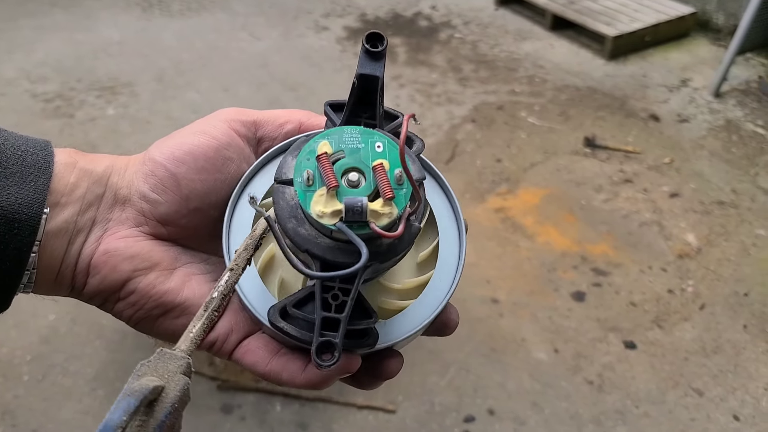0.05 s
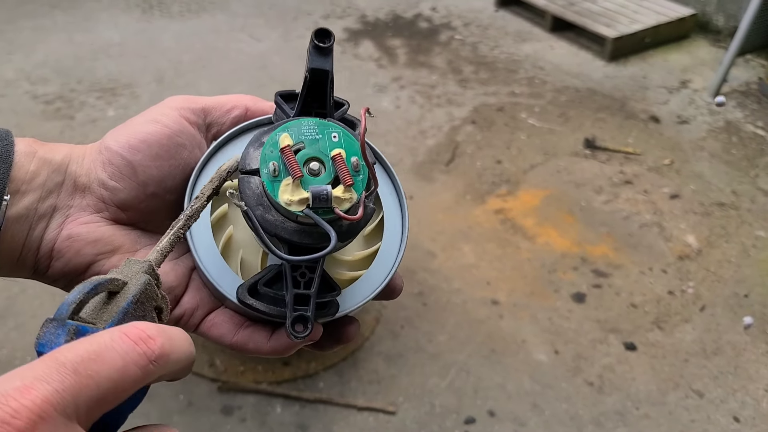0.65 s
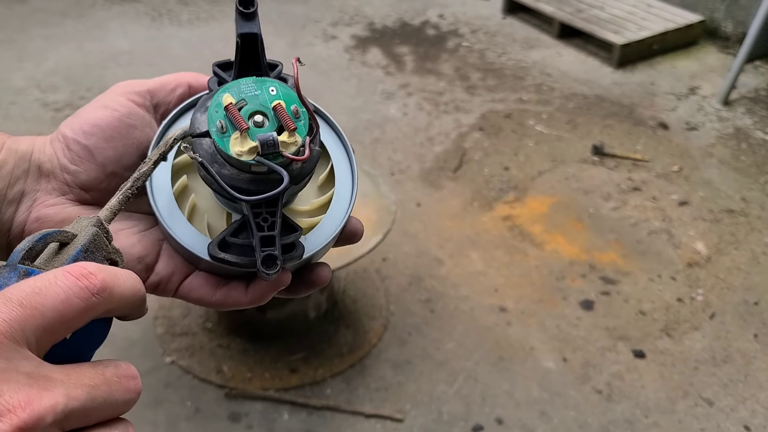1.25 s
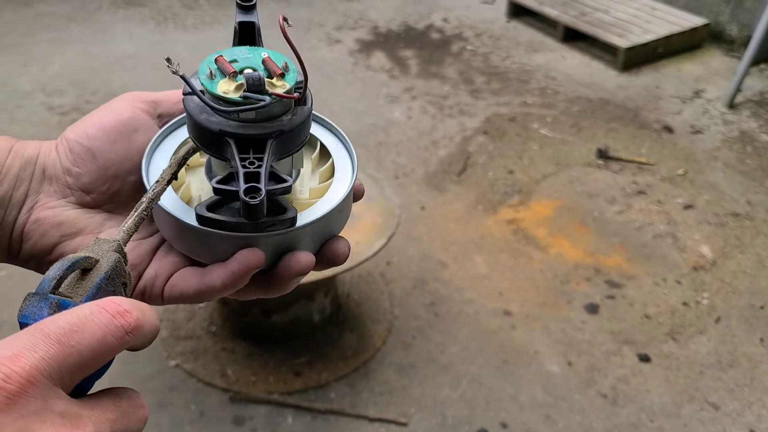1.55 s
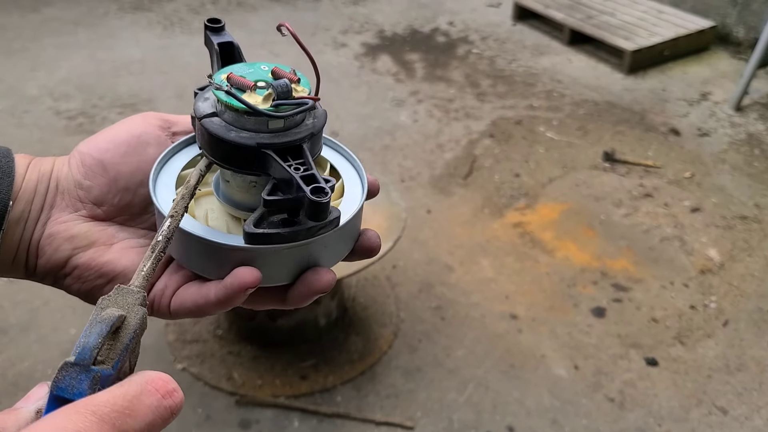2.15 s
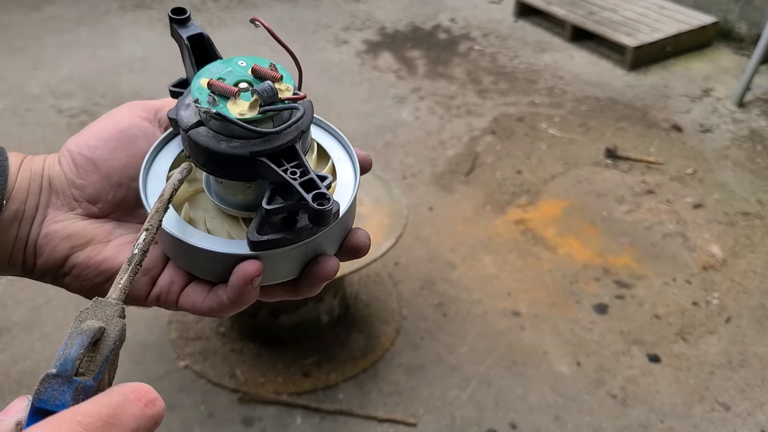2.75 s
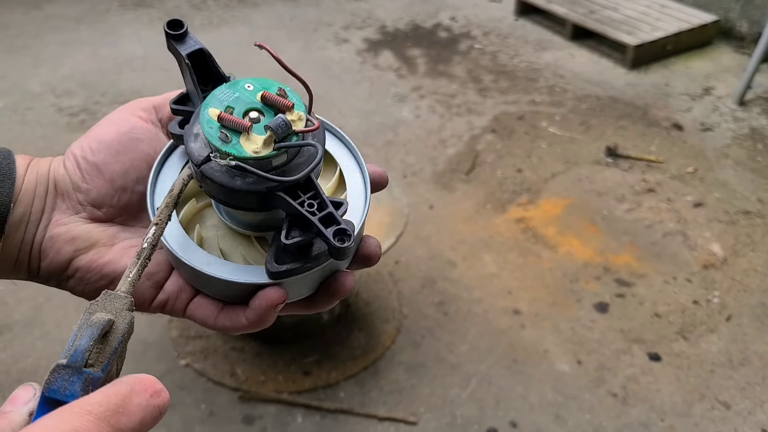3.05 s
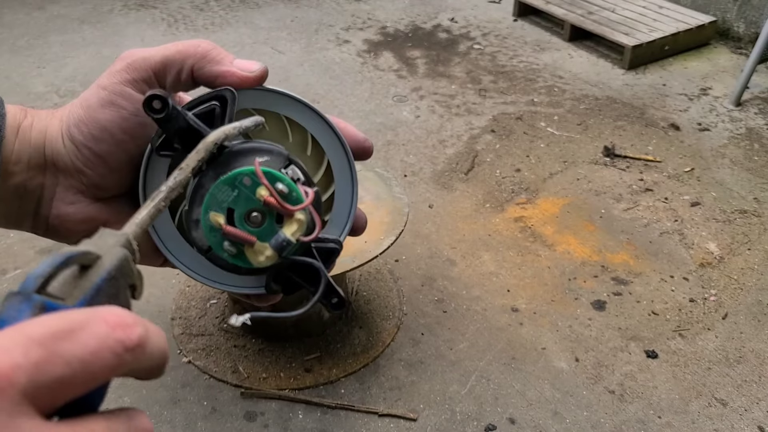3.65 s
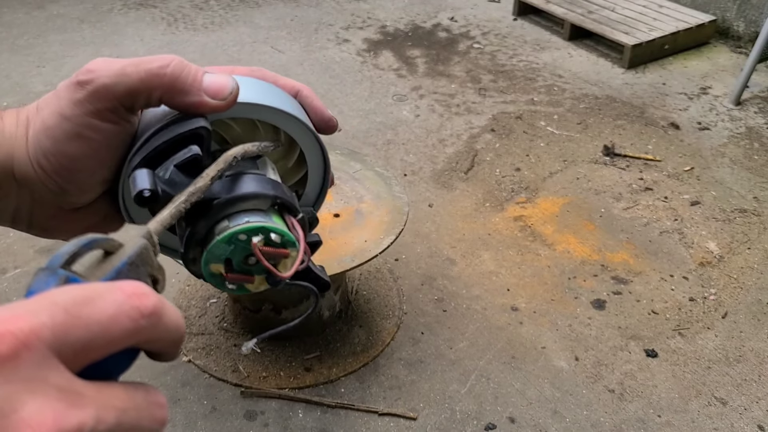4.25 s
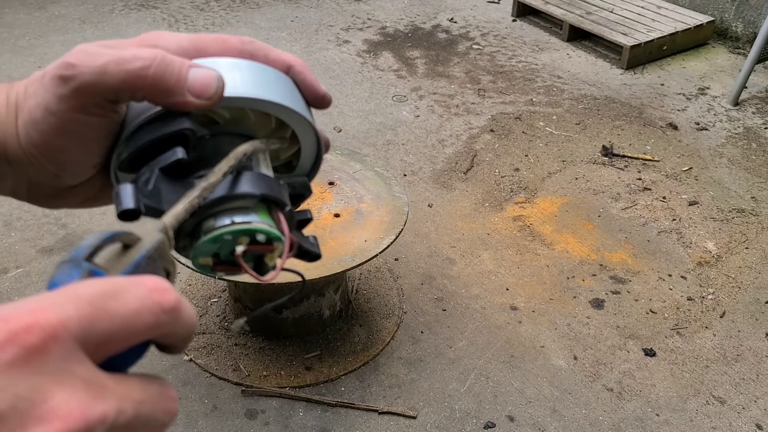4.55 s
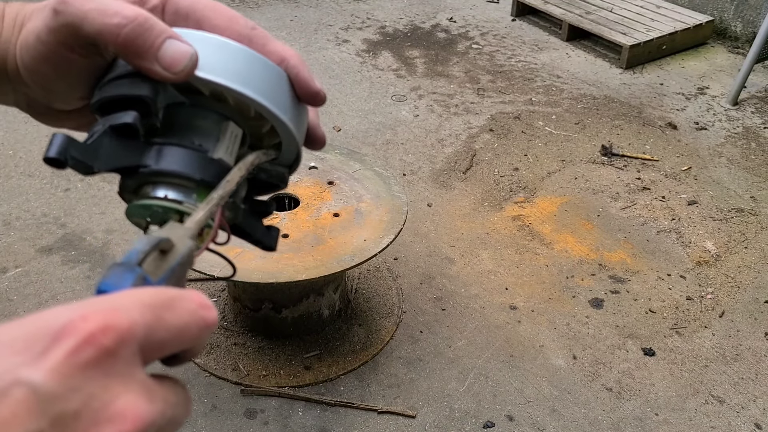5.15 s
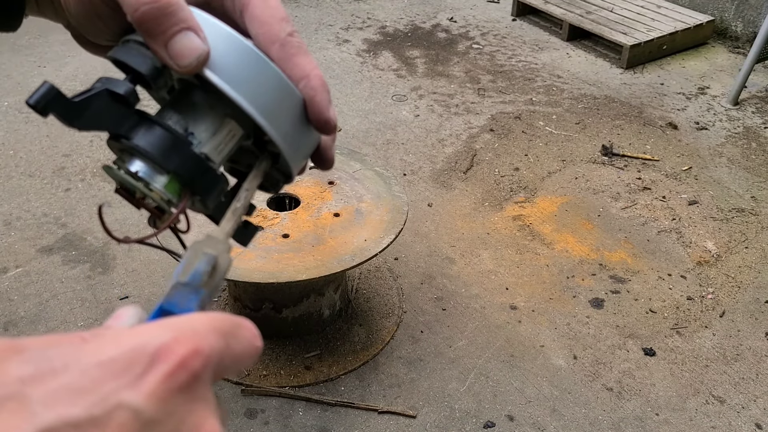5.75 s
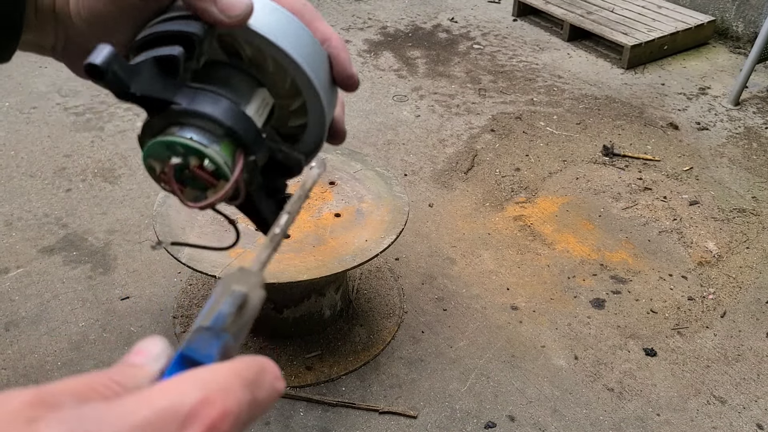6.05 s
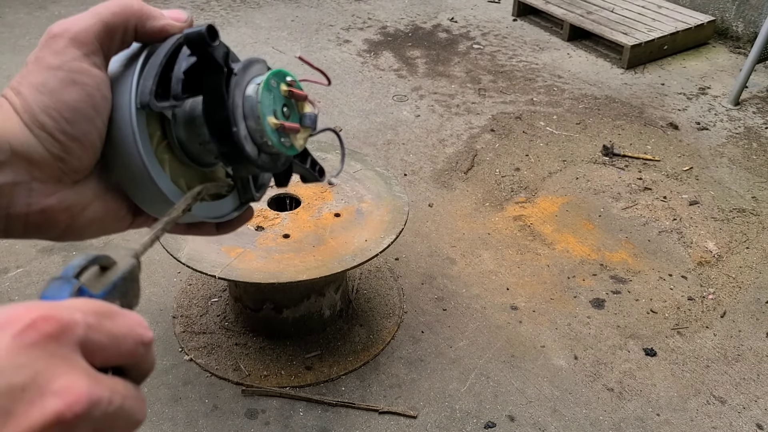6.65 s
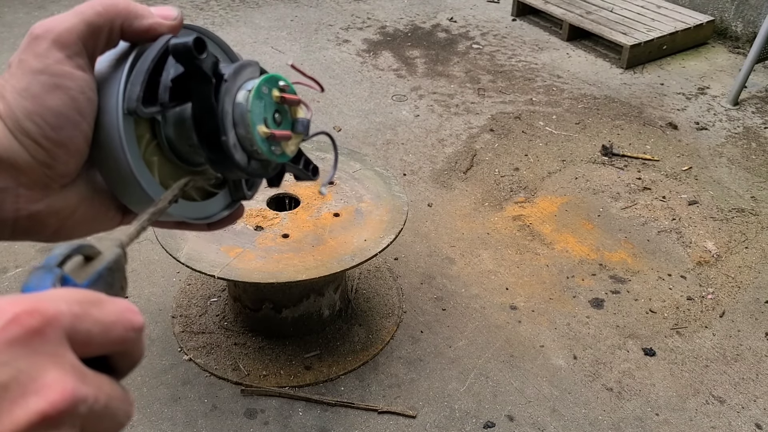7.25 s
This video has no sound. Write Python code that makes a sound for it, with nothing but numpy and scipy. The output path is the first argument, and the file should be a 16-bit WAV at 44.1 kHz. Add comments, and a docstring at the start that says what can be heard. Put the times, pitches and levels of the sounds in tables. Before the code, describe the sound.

Compressed air hisses loudly into a small motor's fan housing, close by in a concrete yard, wavering in tone and lightly buffeting the microphone. It stops briefly, then a second long blast turns hollower as a piston compressor cuts in with a low hum. Air seeps faintly from the valve in the next pause before a third blast starts sharply. Machinery drones quietly far away.

```python
"""A blow gun's air jet cleans a small hand-held vacuum motor and its fan: three long blasts.
The turbulent jet hisses on the parts and excites the resonances of the fan housing; deflected air
buffets the microphone and briefly sounds edge tones. Air seeps from the valve before the last blast.
Near the end of the middle blast a piston compressor cuts in and hums on. The concrete yard returns
a short echo of the jet, and machinery drones far off."""
import sys
import numpy as np
from scipy import signal
from scipy.fft import rfft, irfft, next_fast_len
from scipy.io import wavfile

SR = 44100
rng = np.random.default_rng(int(sys.argv[2]) if len(sys.argv) > 2 else 0)


def generate_wav(signal):
    """Clip the signal to [-1, 1] and save it as 16-bit WAV at the path in sys.argv[1]."""
    frames = np.transpose(np.atleast_2d(signal))
    scaled = np.clip(frames, -1, 1) * 32767
    pcm = np.round(scaled).astype(np.int16)
    wavfile.write(sys.argv[1], SR, pcm)


N = 325899
TIME = np.arange(N) / SR

# Trigger pulls; the finger slips once in the last blast, which thus takes two rows.
# Each row: start of opening, time taken to open, start of closing, all in seconds.
TRIGGER_PULLS = [(-.2, .03, 3.033), (3.4, 0.044, 6.001), (6.615, 0.022, 7.348), (7.351, 0.03, 8.25)]
# Strength of the jet's impact. Each row: time in seconds, overall gain, sizzle gain, housing gain in dB.
JET_GAINS = [
    [(0, -21.5, 1.0, -2), (0.3, -21.0, 0.5, -4), (0.85, -22.5, 0.5, -1), (1.2, -19, -1, -3.5),
     (1.68, -20.5, 0, -0.5), (1.79, -19, 2.5, -4.5), (2.3, -21.5, 5.5, -6), (2.5, -20.5, 2, -4.5),
     (3.02, -21.0, -0.5, -3.5)],
    [(3.44, -24.5, -3, -3), (3.52, -21.0, 3, -5), (3.9, -24, 3, -1.5), (4.2, -21, 1, -4.0),
     (4.7, -22, 6, -4.5), (4.8, -22.5, 0.5, -2), (4.92, -22.5, 4.5, -2.5), (5.3, -21, 0.5, -5),
     (5.47, -25.5, -0.5, -3), (5.75, -22.0, 2, -5), (5.88, -24.5, 1.0, -4.5), (5.99, -20, 7.5, -4)],
    [(6.64, -19.0, -1, -3), (6.9, -21, 1, -2.0), (7.1, -18.5, -1, -1.5), (7.33, -20.0, 0, -2)],
]
# The fan housing's resonance shifts with the aim. Each row: time in seconds, frequency in Hz.
HOUSING_RESONANCE = [(0, 2835), (.83, 2874), (1.02, 2720), (1.06, 2924), (1.73, 3007), (1.8, 2680),
                     (2.0, 2668), (2.64, 2950), (3.5, 3025), (4.78, 3050), (5.5, 2856), (7.39, 2931)]
# Where the jet strikes, as heard at the microphone's two ports. Each row: time in seconds,
# lead of the left port in microseconds, coherence 0-1, left minus right level in dB.
JET_AIM = [(0, 0, 0.2, -0.5), (.6, 13, .17, 0), (1.1, 56, 0.33, -1), (1.65, 65, 0.55, 0),
           (1.95, 41, .56, -2), (2.3, 62, .42, -0.5), (3.03, 47, 0.62, 0), (3.44, 3, 0.43, -1),
           (4.9, 11, .3, -1.4), (5.5, 10, 0.09, 1), (6.63, 61, .75, -1.8), (7.39, 66, 0.64, -2)]
# Spectra of the jet's hiss, its fine sizzle and the rush through the housing.
# Each row: frequency in Hz, relative spectral density in dB.
HISS_SPECTRUM = [(2200, -19), (3300, 4.5), (4100, -3.5), (5000, -0.5), (5700, 1.5), (6400, -1), (7200, 0.5),
                 (8000, 1), (8900, 0.5), (9800, 2), (11500, -10.5), (15000, -32)]
SIZZLE_SPECTRUM = [(7500, -19.5), (9500, -12), (10400, -2.5), (11700, 0), (12600, 0), (13400, -1),
                   (14200, -1), (15300, 0), (16500, -5)]
RUSH_SPECTRUM = [(100, -19), (300, -9), (550, -27), (750, -0.5), (1000, 0), (1350, 2), (1650, 2.5),
                 (1950, 3), (2300, 0.5), (2900, -7), (4500, -30)]
# The nozzle swerves into the fan (+) or off it (-).
# Each row: midpoint in seconds, length in seconds, change of the housing's ring in dB.
NOZZLE_SWERVES = [(0.12, .08, 2), (0.402, .05, 3.5), (0.524, 0.079, 3), (0.693, .12, 2.5),
                  (0.916, 0.087, -4.5), (1.017, 0.088, -4.5), (1.077, 0.047, 3), (1.355, .09, 1),
                  (1.461, 0.074, -4.5), (1.83, .17, -3.5), (2.308, 0.034, 1.5), (2.467, .08, 2),
                  (2.65, 0.11, 2), (3.474, 0.024, -3), (3.605, 0.092, -4), (3.773, 0.15, 1.5),
                  (3.97, 0.044, 1), (4.65, 0.084, -10), (4.732, .05, 2.5), (5.168, 0.027, 1.5),
                  (5.966, 0.042, 1.5), (6.64, 0.027, 0.5)]
# Grazing an edge narrows part of the hiss to a band.
# Each row: midpoint in seconds, length in seconds, band centre in Hz, share of the hiss 0-1.
EDGE_GRAZES = [(0.918, .3, 5000, 0), (1.902, .3, 4876, .3), (3.53, .25, 6780, 0.14),
               (7.002, .8, 5870, 0.04)]
# Air modes of the hollow between housing and palm.
# Each row: centre in Hz, half-width in Hz, relative level in dB.
HOLLOW_MODES = [(976, 204, 0), (1966, 190, -0.5), (2500, 160, -4), (5854, 710, -2.5)]
# Turning the motor opens that hollow. Each row: time in seconds, its share of the rush 0-1.
HOLLOW_SHARE = [(0, 0), (2.1, 0), (3.03, 0.33), (4.6, 0.34), (6.0, 1), (6.63, 0.08), (7.39, 0.04)]
# Early reflections off motor and hand. Each row: mean delay in milliseconds, gain.
NEAR_REFLECTIONS = [(.45, .16), (.7, .17), (1.1, .16), (1.9, .13)]
# The two ports differ in colour. Each row: frequency in Hz, left minus right level in dB.
PORT_BALANCE = [(100, -4.5), (800, 1), (1300, -2), (2200, 1.5), (3200, 3), (4100, 1.5), (5000, 2.5),
                (5900, 1.5), (7500, 2), (9000, 3.5), (11500, 4), (13300, 1.2), (15500, 3.5)]
# Edge tones. Each row: midpoint in seconds, length in seconds, pitch at the midpoint in Hz, level in dB.
EDGE_TONES = [(5.178, .025, 2900, -25), (5.383, .016, 2130, -25), (5.446, 0.041, 2047, -16)]
# Steady spill of air onto the microphone. Each row: time in seconds, relative level in dB.
AIR_SPILL = [(0, -35), (.7, -33), (.95, -43.5), (1.3, -31), (2.6, -31), (3.0, -35.5), (3.5, -38),
             (3.7, -36), (4.6, -32), (5.45, -50.5), (7.39, -42.5)]
# Gusts thrown at the microphone.
# Each row: midpoint in seconds, length in seconds, relative level in dB, left minus right level in dB.
AIR_GUSTS = [(.07, 0.13, -25, 2.5), (0.235, 0.096, -26.5, 0), (.36, 0.22, -25.5, 0),
             (0.604, 0.11, -26.5, -3), (0.717, .1, -26, -1), (0.847, 0.033, -27, 1), (1.1, 0.31, -29, -2.5),
             (1.35, 0.17, -26.5, 1.5), (1.63, 0.17, -26.5, 2), (2.21, 0.37, -23, 3), (2.468, 0.12, -26, 4),
             (2.602, 0.11, -26, 2), (2.799, .2, -27.5, -1), (3.546, 0.078, -29, -17),
             (3.712, 0.033, -28, -1), (3.786, 0.041, -25, 5), (3.856, 0.057, -29.5, -17),
             (3.972, 0.058, -23, -8), (4.087, 0.2, -33, -19), (4.264, 0.084, -26, -5),
             (4.396, 0.14, -29, -20), (4.551, 0.093, -28.5, -24), (4.71, .11, -31, -17),
             (5.03, .07, -30, -10), (5.232, 0.085, -35, -9)]
# Spectra of the wind on the microphone, the seeping air, the compressor's intake and the yard's murmur.
# Each row: frequency in Hz, relative spectral density in dB.
WIND_SPECTRUM = [(15, -30.5), (30, -12), (60, 2.5), (100, 1), (160, -2), (250, -1), (350, -3), (600, -7),
                 (1000, -10), (2000, -16), (5000, -32.5)]
SEEP_SPECTRUM = [(1500, -8), (2700, 2), (3700, 0), (5000, -5), (5900, 2), (7300, -5), (8800, -4),
                 (10300, -4), (13000, 0), (15500, -3)]
INTAKE_SPECTRUM = [(60, 3.5), (150, 3), (300, -5), (500, -9), (1000, -14), (1550, -13), (2200, -19.5),
                   (3200, -21), (5000, -24), (14000, -29)]
YARD_SPECTRUM = [(20, -19), (55, 0), (100, -8), (170, -21), (400, -22), (700, -31.5), (1500, -42.5),
                 (3000, -44.5), (4500, -51), (16000, -58)]
# Thin whistles of the seeping air. Each row: frequency in Hz, level in dB relative to its noise.
SEEP_TONES = [(2680, -10), (3700, -11)]
# The compressor's harmonics. Each row: multiple of the stroke rate, relative level in dB.
STROKE_HARMONICS = [(1, -17), (2, 0), (3, -15), (4, -26), (5, -28), (6, -18), (7, -23), (8, -25), (9, -29),
                    (10, -34), (11, -40), (14, -30), (17, -33), (18, -34), (19, -38), (21, -37), (26, -40),
                    (30, -37), (31, -41), (32, -40)]
# Reverberation of the yard. Each row: frequency in Hz, time to decay by 60 dB in seconds.
YARD_T60 = [(200, 0.45), (1000, 0.32), (3000, 0.32), (8000, 0.25), (15000, 0.18)]
# Tones of the far machinery. Each row: frequency in Hz, level in dB.
MACHINE_TONES = [(53, -55), (59.5, -49.5), (106, -69), (212, -56.5), (322, -66), (421, -65)]

SURGE_DB, SURGE_S = 3.5, 0.15
HISS_DB, SIZZLE_DB, RING_DB, RUSH_DB = 1.0, 1.0, -1.44, -4.0
HISS_SWERVE_SHARE, RUSH_SWERVE_SHARE = 0.61, 0.65
REST_SHARPNESS, GRAZE_SHARPENS, GRAZE_RUSH_DB = 0.17, 1.1, -10   # grazing: sharper ring, weaker rush
EDGE_TONE_FALL_HZ_PER_S = 10000
SEEP_FROM_S, SEEP_TO_S, SEEP_END_DB, SEEP_RISE_DB_PER_S = 6.0, 6.63, -51, 24
SWITCH_ON_S, RUN_UP_S, SWELL_S = 5.45, 0.05, 0.079
STROKES_PER_S, START_STROKES_PER_S, COMPRESSOR_DB = 47.66, 38, -30.8
MOTOR_HZ, MOTOR_DB, OTHER_HARMONICS_DB = 196.3, -19, -44   # levels relative to the compressor's


def jet():
    """Turbulence striking a solid radiates broadband noise and drives the cavity behind it."""
    level_db, sizzle_db, housing_db = in_time(np.vstack(JET_GAINS))
    lead_us, coherence, pan_db = in_time(JET_AIM)
    swerve_db = sum(db * swell(s, length) for s, length, db in NOZZLE_SWERVES)
    graze = sum(share * swell(s, length) for s, length, _, share in EDGE_GRAZES)
    edge_hz, = in_time([(s + side * length / 2, hz)
                        for s, length, hz, _ in EDGE_GRAZES for side in (-1, 1)])
    hiss = blend(noise(HISS_SPECTRUM, channels=3), resonant_noise(edge_hz, width_hz=1060), graze)
    hiss = from_db(HISS_DB + HISS_SWERVE_SHARE * swerve_db) * at_ports(hiss, coherence, lead_us)
    sizzle_gain = from_db(SIZZLE_DB + sizzle_db + 0.45 * drift(12))
    sizzle = sizzle_gain * at_ports(noise(SIZZLE_SPECTRUM, channels=3), 0.72 * coherence, lead_us)
    housing = from_db(housing_db) * at_ports(fan_housing(swerve_db, graze), 0.74, lead_us)
    flutter = from_db(0.9 * drift(20))   # the jet flaps on the edges it meets
    envelope = from_db(level_db + hose_surge()) * flutter * valve(shut_s=0.0081, inertia=1.0)
    return envelope * panned(pan_db) * (hiss + sizzle + housing)


def valve(shut_s, inertia):
    """A valve throttles the flow: a quadratic rise, stretched by inertia, and an exponential fall."""
    flow = 0
    for on, rise, off in TRIGGER_PULLS:
        opening = np.clip((TIME - on) / (rise * inertia), 0, 1) ** 2
        flow = flow + opening * np.exp(-np.maximum(TIME - off, 0) / shut_s)
    return flow


def hose_surge():
    """Stored pressure adds decibels at the start of a blast, if the hose has had time to refill."""
    rested = [pull for before, pull in zip([None] + TRIGGER_PULLS, TRIGGER_PULLS)
              if before is None or pull[0] - before[2] > SURGE_S]
    return sum(SURGE_DB * (TIME > on) * np.exp(-np.maximum(TIME - on - rise, 0) / SURGE_S)
               for on, rise, _ in rested)


def fan_housing(swerve_db, graze):
    """Cavity resonance: the blown housing rings in a moving band while air rushes through it."""
    ring_hz, = in_time(HOUSING_RESONANCE)
    hollow_share, = in_time(HOLLOW_SHARE)
    broad = resonant_noise(ring_hz + 40, width_hz=660)
    sharp = resonant_noise(ring_hz, width_hz=190)
    ring = blend(broad, sharp, REST_SHARPNESS * (1 - hollow_share) + GRAZE_SHARPENS * graze)
    rush = blend(noise(RUSH_SPECTRUM, channels=3), from_db(3.0) * palm_hollow(), hollow_share)
    ring_db = RING_DB + swerve_db + 1.14 * drift(10)
    rush_db = RUSH_DB + RUSH_SWERVE_SHARE * swerve_db + GRAZE_RUSH_DB * graze + 0.55 * drift(8.3)
    return from_db(ring_db) * ring + from_db(rush_db) * rush


def resonant_noise(centre_hz, width_hz):
    """A resonance driven by turbulence gives a band of noise: a carrier of random amplitude and phase."""
    phase = phase_of(centre_hz)
    in_phase, quadrature = drift(width_hz, channels=3), drift(width_hz, channels=3)
    return rms_one(in_phase * np.cos(phase) + quadrature * np.sin(phase))


def palm_hollow():
    """The stationary air modes between housing and palm filter the turbulence."""
    def response(hz):
        return sum(from_db(db) / np.sqrt(width) / (1 + ((hz - centre) / width) ** 2) ** 0.93
                   for centre, width, db in HOLLOW_MODES)
    return rms_one(filtered(rng.standard_normal((3, N)), response))


def with_near_reflections(direct):
    """Comb filtering: reflections off the turning motor slide in delay and give a shifting colour."""
    total = direct.copy()
    for ms, gain in NEAR_REFLECTIONS:
        delays_s = ms / 1000 * (1 + 0.05 * drift(0.7, channels=2))
        total += gain * np.array([np.interp(TIME - s, TIME, side) for side, s in zip(direct, delays_s)])
    return total


def edge_tones():
    """A jet crossing a slot oscillates about its edge and sounds short, rough, falling tones."""
    tones = 0
    for s, length, hz, db in EDGE_TONES:
        pitch_hz = hz - EDGE_TONE_FALL_HZ_PER_S * np.clip(TIME - s, -length / 2, length / 2)
        phase = phase_of(pitch_hz * (1 + 0.032 * drift(218)[0]))
        envelope = swell(s, length) * from_db(db + 1.1 * drift(120))
        tones = tones + envelope * rms_one(np.sin([phase, phase - 0.7]))
    return tones


def buffeting():
    """Eddies in the deflected air press on each port separately and make a lumpy rumble."""
    spill_db, = in_time(AIR_SPILL)
    gust_power = sum((from_db(db) * panned(pan_db)[:, None]) ** 2 * swell(s, length)
                     for s, length, db, pan_db in AIR_GUSTS)
    level = from_db(4.5) * np.sqrt(from_db(spill_db) ** 2 + gust_power)
    eddies = from_db(1.9 * drift(32, channels=2) + drift(21))
    rumble = rms_one(noise(WIND_SPECTRUM, channels=2) * eddies)
    return level * rumble * valve(shut_s=0.01, inertia=3.7)


def valve_seep():
    """Air seeps from the valve before the last blast and grows louder as the nozzle approaches; the trickle
    sings faintly in the fan."""
    level_db = SEEP_END_DB - SEEP_RISE_DB_PER_S * np.maximum(SEEP_TO_S - TIME, 0)
    air = noise(SEEP_SPECTRUM, channels=2)
    for hz, db in SEEP_TONES:
        air = air + from_db(db) * rms_one(drift(70, channels=2) * np.sin(2 * np.pi * hz * TIME))
    leaking = (TIME > SEEP_FROM_S) * (TIME < SEEP_TO_S)
    return leaking * from_db(level_db + drift(25)) * air


def compressor():
    """Periodic piston strokes run up and give a harmonic series, with motor hum and pulsing intake noise."""
    running_s = np.maximum(TIME - SWITCH_ON_S, 0)
    stroke_hz = STROKES_PER_S + (START_STROKES_PER_S - STROKES_PER_S) * np.exp(-running_s / RUN_UP_S)
    level = from_db(COMPRESSOR_DB) * (1 - np.exp(-(running_s / SWELL_S) ** 2))
    phase = phase_of(stroke_hz * (1 + 0.00175 * drift(6.4)[0]))
    port_phase = phase + 0.055 * np.array([[0.5], [-0.5]])   # walls put the ports out of step
    harmonic_db = dict(STROKE_HARMONICS)
    strokes = sum(from_db(harmonic_db.get(k, OTHER_HARMONICS_DB)) * np.sin(k * port_phase + offset)
                  for k, offset in enumerate(rng.uniform(0, 2 * np.pi, size=32), 1))
    motor = from_db(MOTOR_DB) * np.sin(2 * np.pi * MOTOR_HZ * TIME)
    intake = from_db(-18.5) * distant(noise(INTAKE_SPECTRUM, channels=3), coherence=0.089)
    pulsing = 1 + 0.22 * np.sin(2 * phase)
    hum = np.sqrt(2) * (strokes + motor) * from_db(0.34 * drift(8.7))
    return level * (hum + intake * pulsing)


def yard_echo(source):
    """Reverberation: walls and ground return a short, exponential tail whose treble dies first."""
    t = TIME[:SR // 2]
    edges_hz = np.geomspace(100, 18000, 9)
    tail = 0
    for low, high in zip(edges_hz, edges_hz[1:]):
        band_pass = signal.butter(2, [low, high], "band", fs=SR, output="sos")
        band = signal.sosfilt(band_pass, rng.standard_normal((2, len(t))))
        tail = tail + band * from_db(-60 * t / at_hz(YARD_T60, np.sqrt(low * high)))
    tail = tail * (t > 0.007)   # the first reflection arrives after 7 ms
    return signal.fftconvolve(source, tail / np.sqrt(np.sum(tail ** 2) / 2), axes=1)[:, :N]


def far_machinery():
    """Neighbouring tones of far machines beat against each other over the low murmur of the yard."""
    drone = 0
    for hz, db in MACHINE_TONES:
        amplitude = np.sqrt(2) * from_db(db + 0.83 * drift(4.7)[0])
        drone = drone + amplitude * np.sin(2 * np.pi * hz * TIME + rng.uniform(0, 2 * np.pi))
    return drone + from_db(-49.0) * distant(noise(YARD_SPECTRUM, channels=3), coherence=0.62)


def at_ports(three, coherence, lead_us):
    """Path difference: the first signal is direct and reaches the right port later; two are scattered."""
    fine = signal.resample_poly(three[0], 4, 1)   # oversampling keeps the treble under a moving delay
    late = np.interp((TIME - lead_us / 10 ** 6) * SR * 4, np.arange(len(fine)), fine)
    return blend(three[1:], np.array([three[0], late]), coherence)


def distant(three, coherence):
    """Partial coherence: the first signal reaches both ports at once; the other two are scattered."""
    return blend(three[1:], three[0], coherence)


def panned(pan_db):
    """A level difference sets the left and right gains at constant total power."""
    gains = from_db(np.array([pan_db, -pan_db]) / 2)
    return gains / np.sqrt(np.mean(gains ** 2, axis=0))


def blend(a, b, share):
    """Uncorrelated sounds add in power, so they cross-fade with square-root gains."""
    share = np.clip(share, 0, 1)
    return np.sqrt(1 - share) * a + np.sqrt(share) * b


def noise(spectrum, channels):
    """Filtering white noise gives uncorrelated noises of one colour, rms 1."""
    return rms_one(filtered(rng.standard_normal((channels, N)), lambda hz: from_db(at_hz(spectrum, hz))))


def drift(rate_hz, channels=1):
    """Noise through two one-pole low-passes fluctuates smoothly, with rms near 1."""
    step = 50 if rate_hz < 60 else 1   # slow fluctuations need only a coarse grid
    run_in = 2000
    pole = np.exp(-2 * np.pi * rate_hz * step / SR)
    white = rng.standard_normal((channels, N // step + 2 + run_in))
    smooth = rms_one(signal.lfilter([1], [1, -2 * pole, pole * pole], white)[:, run_in:])
    return np.array([np.interp(np.arange(N) / step, np.arange(len(row)), row) for row in smooth])


def filtered(x, gain_at):
    """A linear filter multiplies the spectrum by a gain that depends on frequency."""
    size = next_fast_len(N, real=True)
    hz = np.maximum(np.fft.rfftfreq(size, 1 / SR), 1)
    return irfft(rfft(x, size) * gain_at(hz), size)[..., :N]


def swell(middle_s, length_s):
    """A flat-topped window 0-1, whose length is its full width at half height."""
    return 0.5 ** np.minimum((2 * (TIME - middle_s) / length_s) ** 4, 60)


def in_time(rows):
    """Linear interpolation in time gives one curve for each column after the first."""
    seconds, *columns = np.transpose(rows)
    return [np.interp(TIME, seconds, column) for column in columns]


def at_hz(points, hz):
    """Interpolation on a logarithmic frequency axis."""
    table_hz, values = np.transpose(points)
    return np.interp(np.log(hz), np.log(table_hz), values)


def phase_of(hz):
    """Phase is the time integral of frequency."""
    return 2 * np.pi * np.cumsum(hz) / SR


def from_db(db):
    """Amplitude grows tenfold for every 20 dB."""
    return 10 ** (np.asarray(db) / 20)


def rms_one(x):
    """Normalisation to unit mean power."""
    return x / np.sqrt(np.mean(np.abs(x) ** 2) + 1e-20)


def scene():
    """Superposition of the blasts, their echo, the stray air and the machines behind."""
    blasts = with_near_reflections(jet()) + edge_tones()
    blasts = filtered(blasts, lambda hz: panned(at_hz(PORT_BALANCE, hz)))
    echo = from_db(-16.5) * yard_echo(blasts)
    return blasts + echo + valve_seep() + buffeting() + compressor() + far_machinery()


def record(dry):
    """Soft saturation rounds only the tallest peaks; a steep low-pass cuts the top of the treble."""
    ceiling, cutoff_hz = 0.78, 15800
    rounded = dry / (1 + (dry / ceiling) ** 8) ** (1 / 8)
    return signal.sosfilt(signal.ellip(12, 0.1, 80, cutoff_hz, fs=SR, output="sos"), rounded)


dry = scene()
out = record(dry)
generate_wav(out)
```